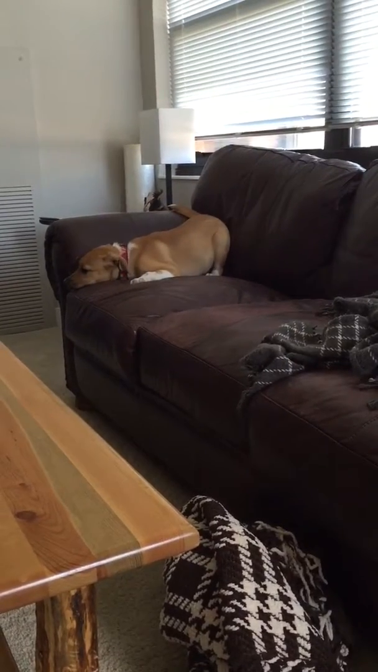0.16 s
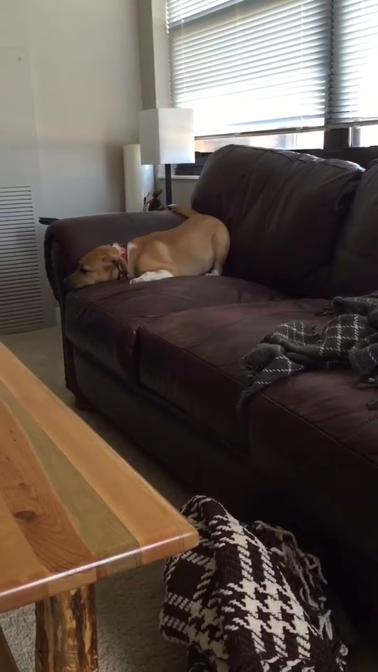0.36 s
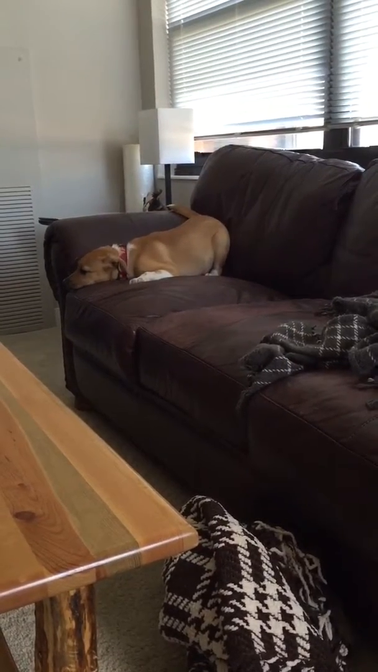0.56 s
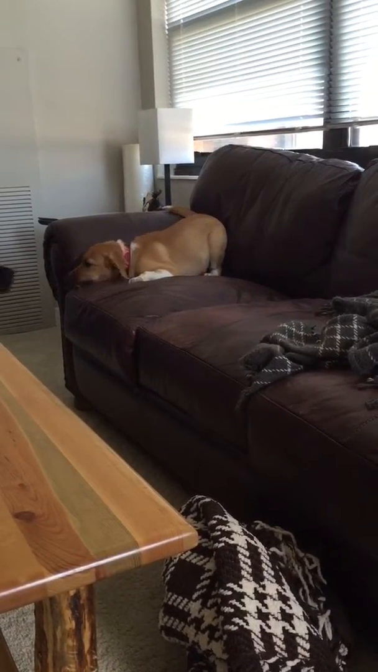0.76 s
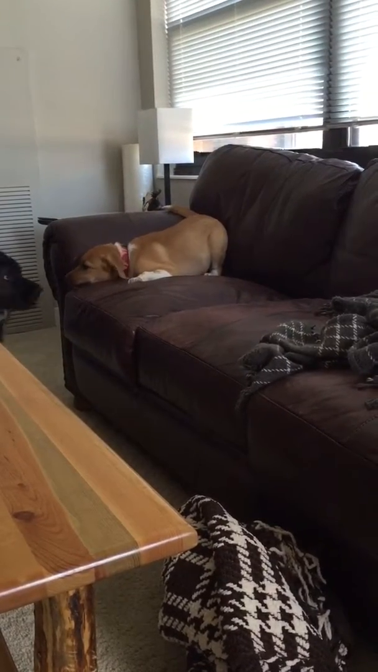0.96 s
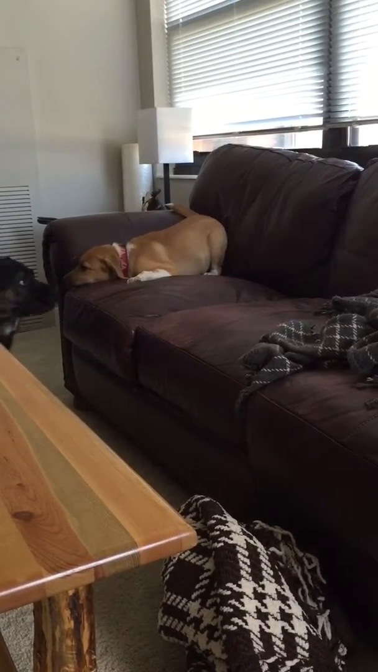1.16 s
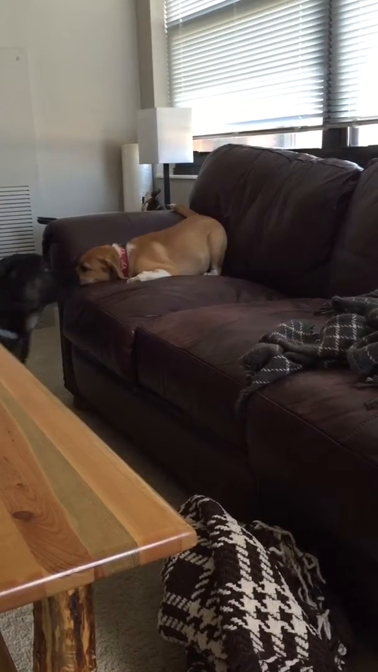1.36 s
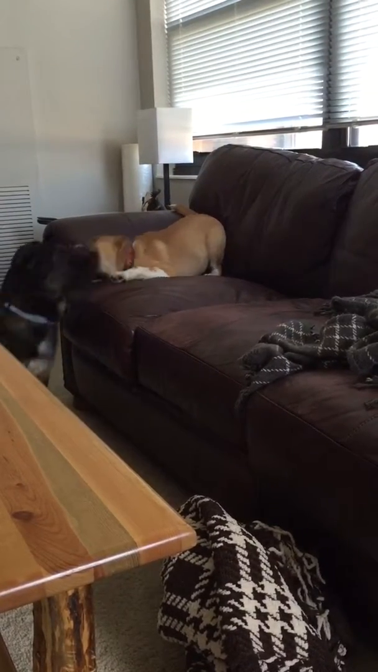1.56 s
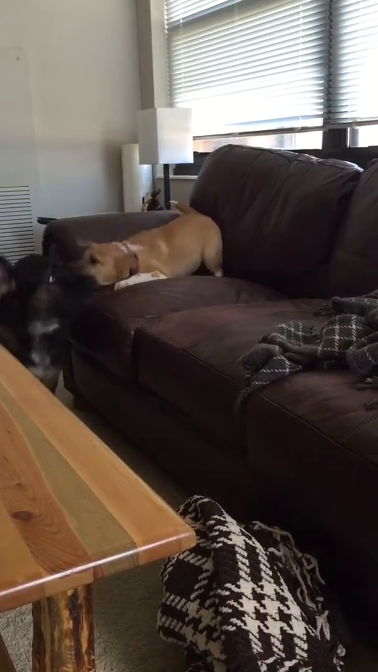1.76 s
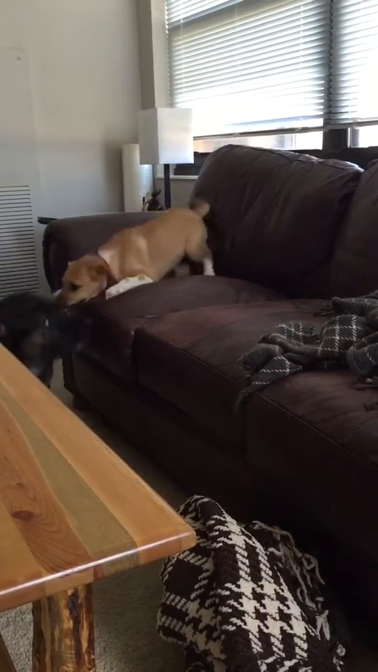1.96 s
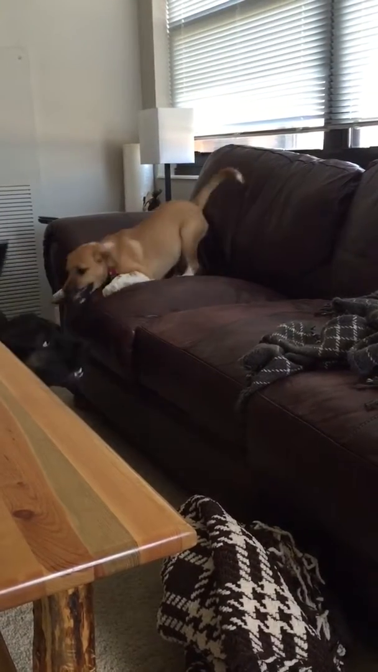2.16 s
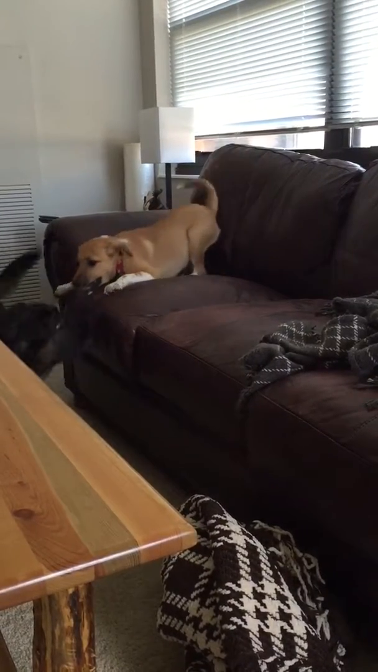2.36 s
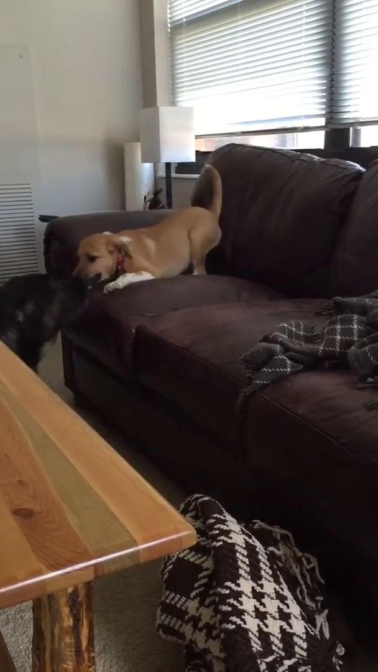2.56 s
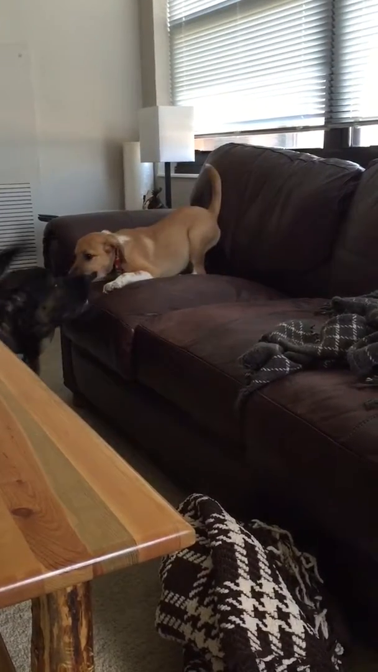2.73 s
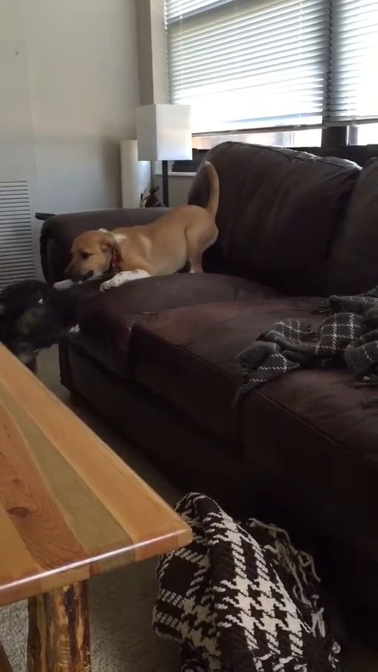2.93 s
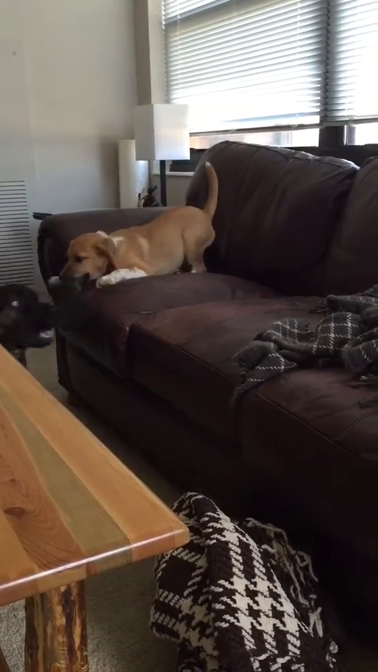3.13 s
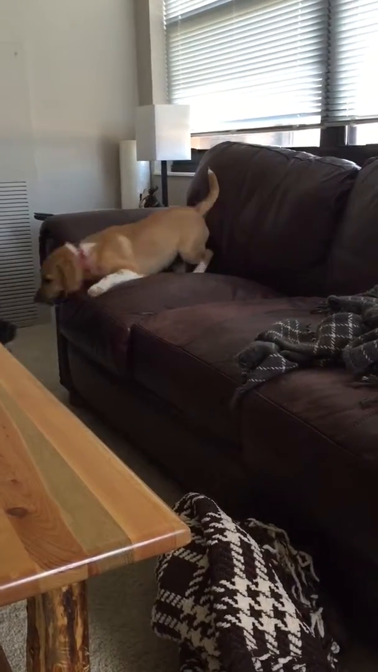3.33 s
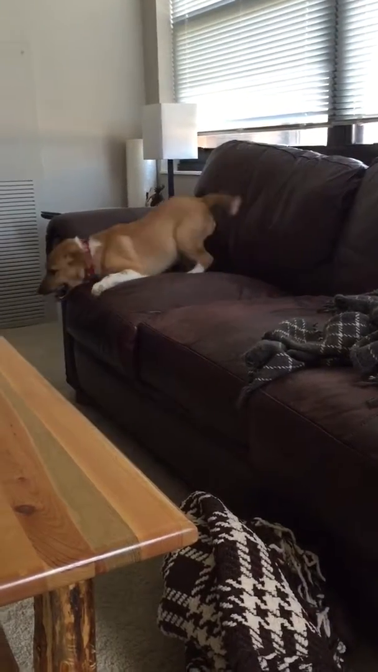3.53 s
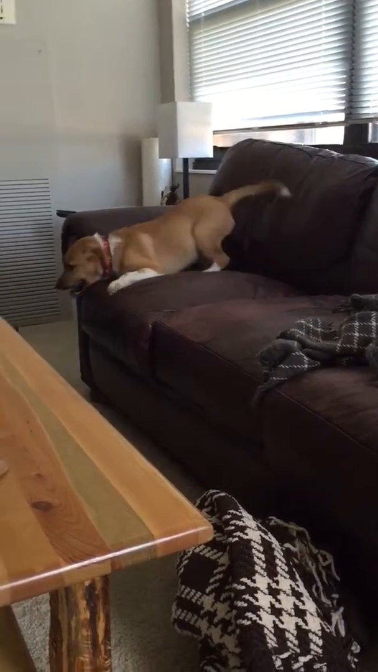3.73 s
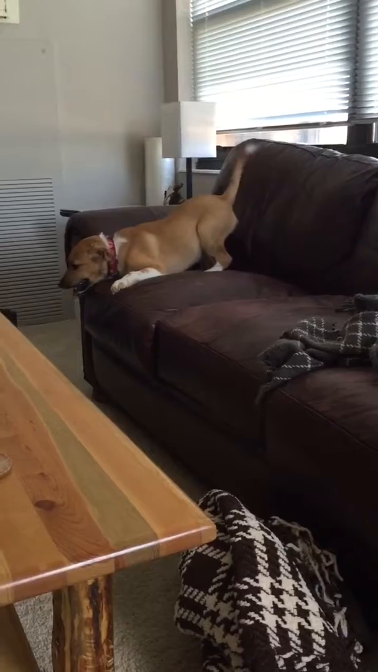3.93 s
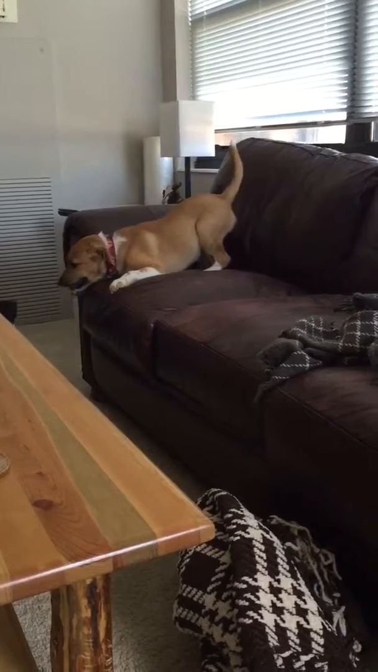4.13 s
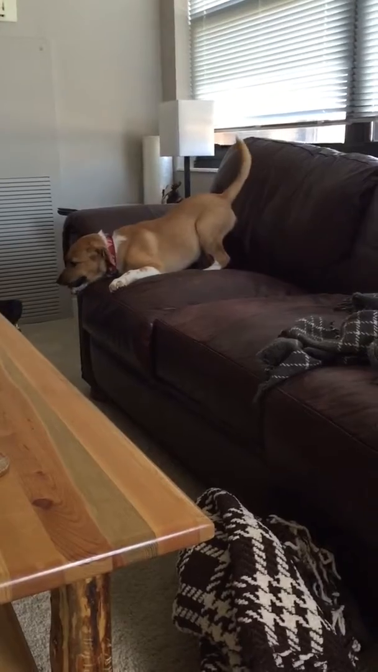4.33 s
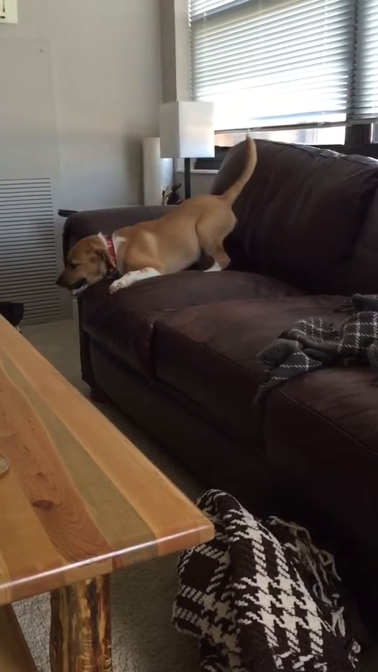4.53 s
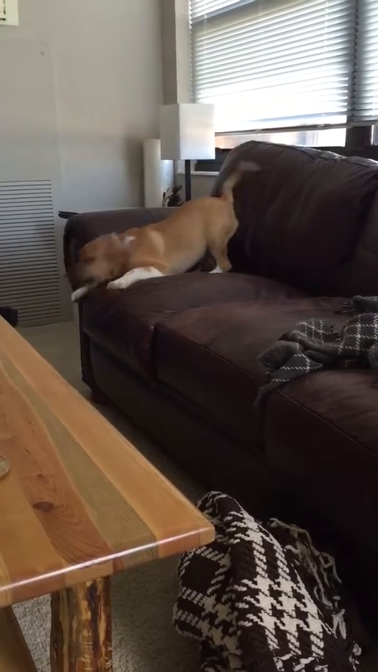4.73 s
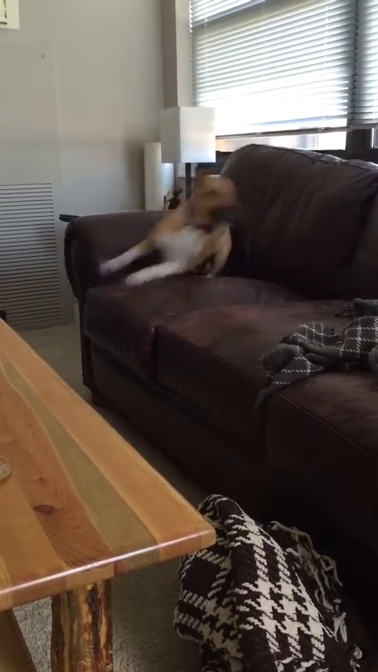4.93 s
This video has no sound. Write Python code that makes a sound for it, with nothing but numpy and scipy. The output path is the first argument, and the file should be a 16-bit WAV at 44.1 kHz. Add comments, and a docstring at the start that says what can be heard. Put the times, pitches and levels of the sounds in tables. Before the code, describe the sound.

A faint, steady low electric hum with soft ventilation rumble fills a furnished living room throughout about five seconds. A barely audible scuff on leather comes at 0.25 s, then a very thin, high, fluttering nasal whine at about 0.4 s. A faint breathy huff at 0.65 s and a stronger gruff one at 0.8 s follow, with a leather rub and light claw or collar brushes until 1.15 s. A third huff at 1.6 s and brushing lead into a low growl at 1.8 s that jumps up into a short, rough bark near 1.95 s. Soft scuffs continue from 2.1 to 3.15 s. The second bark, at 3.2 to 3.4 s, starts hoarse and clears into a louder yap. A scuff and brush tick at 3.8 s, then near quiet. The third bark, at 4.7 to 4.85 s, leaps upward, highest and clearest, its short room ring fading into the hum.

```python
"""A puppy on a leather sofa barks at another dog in a living room, over a steady electric hum and ventilation.
Soft scuffs start first, then a thin whine, two gruff huffs, light brushes and a third huff.
The first bark grows out of a low growl; after more scuffs the second starts hoarse and clears into a yap.
A last scuff and brush lead to the third bark, the highest and clearest.
Folds, rushing air and moving throat resonances make the voice; shaped noise makes the rubs and room air."""
import sys
import numpy as np
from scipy import signal
from scipy.fft import rfft, irfft
from scipy.io import wavfile
from scipy.ndimage import uniform_filter1d, minimum_filter1d

SR = 44100
rng = np.random.default_rng(int(sys.argv[2]) if len(sys.argv) > 2 else 0)


def wav_out(sig):
    """Save sig, one row per channel (or a flat mono array), as 16-bit PCM at SR to the path in sys.argv[1]."""
    wavfile.write(sys.argv[1], SR, np.round(np.clip(np.atleast_2d(sig).T, -1, 1) * 32767).astype(np.int16))


N = 224398  # samples, about 5.1 s
EDGE_HZ = 15300  # upper edge of everything heard


def gain_of(db):
    """Decibels to amplitude."""
    return 10 ** (np.asarray(db) / 20)


def evened(x):
    """Scales to rms 1."""
    return x / np.sqrt(np.mean(x ** 2) + 1e-20)


def blend(a, b, share):
    """Goes from a to b as share goes from 0 to 1."""
    return a + (b - a) * share


def read(points, hz):
    """Reads a table on a log-frequency axis."""
    f, value = np.transpose(points)
    return np.interp(np.log(hz + 1), np.log(f + 1), value)


def curves(rows):
    """Sample times and the columns of a table joined by straight lines."""
    s, *columns = np.transpose(rows)
    t = np.arange(s[0], s[-1], 1 / SR)
    return t, [np.interp(t, s, c) for c in columns]


def add(mix, s, sound):
    """Mixes a sound in at time s."""
    part = mix[round(s * SR):][:len(sound)]
    part += sound[:len(part)]


def hump(hz, centre, width):
    """Amplitude gain of a resonance, halved at half the width from its centre."""
    return 1 / (1 + (2 * (hz - centre) / width) ** 2)


def noise(gain, n):
    """Noise of rms 1 whose colour is the function gain(Hz)."""
    spectrum = rfft(rng.standard_normal(n)) * gain(np.fft.rfftfreq(n, 1 / SR))
    return evened(irfft(spectrum, n))


def waver(rate_hz, n):
    """Slow random drift of rms 1, mostly below the given rate."""
    return noise(lambda f: hump(f, 0, 2 * rate_hz), n)


# mains hum throughout the room: pitch_hz [Hz], level_db [dB rms]
HUM_TONES = [(120, -44), (240, -71.5), (360, -77)]


def mains_hum():
    """Steady sine tones at multiples of 120 Hz."""
    t = np.arange(N) / SR
    hum = np.zeros(N)
    for hz, db in HUM_TONES:
        phase = 2 * np.pi * (hz * t + rng.random())
        hum += gain_of(db) * np.sqrt(2) * np.sin(phase)
    return hum


# ventilation rumble in the room: centre_hz [Hz], width_hz [Hz at half amplitude], level_db [dB rms]
VENTILATION = [(67.8, 28, -56), (122.5, 29, -54), (179, 55, -59), (222, 31, -69)]


def ventilation_rumble():
    """Low noise gathered into broad resonances."""
    return sum(gain_of(db) * noise(lambda f: hump(f, hz, width), N) for hz, width, db in VENTILATION)


# colour of the room air, before its roll-off below 220 Hz: frequency_hz [Hz], density_db [relative dB per Hz]
AIR_COLOUR = [(15, -52), (25, -20.5), (69, -13), (95, 10), (125, 1.5), (146, -2.5), (167, -17.5),
              (237, -19), (335, -27.5), (543, -39), (604, -34), (691, -41.5), (769, -38.5), (1240, -47),
              (15000, -65.5)]
AIR_LEVEL_DB = -57.5  # rms


def room_air():
    """A faint steady murmur of noise, strongest near 100 Hz."""
    return gain_of(AIR_LEVEL_DB) * noise(lambda f: gain_of(read(AIR_COLOUR, f)) / (1 + (220 / (f + 1)) ** 4), N)


# ring time of the living room, scaled by a share for each tail: frequency_hz [Hz], t60_s [s, at share 1]
RING_TIMES = [(150, 1), (500, 0.64), (1100, 0.63), (2200, 0.6), (3300, 0.52), (4500, 0.54), (8000, 0.57),
              (14000, 0.45)]


def tail(t60_share, delay_s):
    """Dense reflections of energy 1, each band dying at its own speed."""
    signs = rng.choice([-1., 1.], SR)
    taps = signs * (rng.random(SR) < 4000 / SR) * (np.arange(SR) > delay_s * SR)
    hz, t, z = signal.stft(taps, SR, nperseg=256)
    decay = gain_of(-60 * t / (t60_share * read(RING_TIMES, hz)[:, None]))
    response = signal.istft(z * decay, SR, nperseg=256)[1][:SR]
    return response / np.linalg.norm(response)


# sofa, table and wall, with paths about 1, 3 and 4 m longer than the direct one:
# delay_s [s], gain [ratio to the direct sound]
NEAR_SURFACES = [(.0031, 0.12), (.0094, 0.22), (0.012, .2)]


def room(x, early_db=-3.5, early_share=0.34, late_db=-13.0, late_share=1.07):
    """Direct sound, near surfaces, a quick dense wash and a quieter long ring, together of energy 1."""
    response = gain_of(early_db) * tail(early_share, .002) + gain_of(late_db) * tail(late_share, 0.036)
    response[0] += 1  # straight to the microphone
    for s, gain in NEAR_SURFACES:
        response[round(s * SR)] += gain
    return signal.fftconvolve(x, response / np.linalg.norm(response))[:N]


def rub(colour, s, db, rise, fade, edge_hz=EDGE_HZ, grain_db=3):
    """A short stroke of grainy friction: a straight rise, then an exponential fade."""
    t = np.arange(SR // 3) / SR
    stroke = np.minimum(t / rise, 1) * np.exp(-np.maximum(t - rise, 0) / fade)
    grains = noise(lambda f: gain_of(read(colour, f)) / np.sqrt(1 + (f / edge_hz) ** 4), len(t))
    return s, gain_of(db) * stroke * evened(grains * gain_of(grain_db * waver(120, len(t))))


# paws and bodies on the sofa: start_s [s], level_db [dB], rise_s [s], fade_s [s], upper_edge_hz [Hz]
SOFA_SCUFFS = [(.245, -64, 0.0045, 0.015, 1490), (0.84, -54.5, 0.017, 0.017, 6000),
               (2.138, -53, 0.016, 0.038, 3630), (2.23, -70, 0.023, 0.031, 2910),
               (2.421, -68, 0.012, .04, 3065), (2.531, -56, 0.035, 0.02, 3580),
               (2.98, -70.5, .01, 0.017, 3460), (3.149, -54.5, 0.046, .03, 3560),
               (3.792, -53.5, 0.007, .025, 3917)]
# colour of rubbed leather: frequency_hz [Hz], level_db [dB]
LEATHER_COLOUR = [(100, -12), (230, -1), (600, 1), (1100, 0.5), (1500, 0), (2200, -0.5), (3300, -0.5),
                  (4500, -8.5), (15000, -26)]


def scuff(s, db, rise, fade, edge_hz):
    """Leather friction, its treble rolled off above the stroke's own edge."""
    return rub(LEATHER_COLOUR, s, db, rise, fade, edge_hz)


# light brushes of claws and collar: start_s [s], level_db [dB], rise_s [s], fade_s [s]
CLAW_BRUSHES = [(1.06, -57.5, 0.0017, 0.013), (1.145, -66.5, 0.012, 0.018), (1.615, -64, .015, 0.1),
                (1.699, -65, 0.0073, 0.035), (1.801, -52.5, 0.027, 0.12), (3.79, -60, 0.0089, 0.016)]
# colour of claws and collar: frequency_hz [Hz], level_db [dB]
CLAW_COLOUR = [(500, -12), (2500, -3.5), (6000, -6), (10000, -10.5), (15000, -7.5)]


def brush(s, db, rise, fade):
    """Bright friction of claws and collar."""
    return rub(CLAW_COLOUR, s, db, rise, fade)


# thin whines through the nose, strongest an octave above these pitches:
# start_s [s], length_s [s], level_db [dB, before its fade], first_pitch_hz [Hz], last_pitch_hz [Hz]
NOSE_WHINES = [(0.37, .088, -53.5, 3410, 3390), (0.438, 0.024, -64.5, 2730, 2730)]
WHINE_RISE_S, WHINE_FADE_DB_PER_S = .009, -150


def whine(s, length, db, first_hz, last_hz, jitter=0.0296, fundamental_db=-13):
    """A fluttering whistle, strongest at its octave."""
    t = np.arange(0, length, 1 / SR)
    hz = blend(first_hz, last_hz, t / length) * (1 + jitter * waver(250, len(t)))
    phase = 2 * np.pi * np.cumsum(hz) / SR
    level = np.minimum(t / WHINE_RISE_S, 1) * gain_of(db + WHINE_FADE_DB_PER_S * t)
    level *= signal.windows.tukey(len(t), .1)
    return s, level * evened(np.sin(2 * phase) + gain_of(fundamental_db) * np.sin(phase))


# low throb of the chest under huff, growl and hoarse attack, before its unsteadiness:
# start_s [s], length_s [s], level_db [dB, peak], first_pitch_hz [Hz], last_pitch_hz [Hz]
CHEST_THROBS = [(0.8, 0.041, -42.5, 231, 220), (1.798, 0.12, -31, 166.8, 173),
                (1.882, .135, -37, 235.3, 416), (3.215, .1, -42, 271.4, 334)]


def chest(s, length, db, first_hz, last_hz, unsteady=0.16):
    """An unsteady low tone that swells, throbs in level and fades."""
    u = np.arange(0, length, 1 / SR) / length
    hz = blend(first_hz, last_hz, u) * (1 + unsteady * waver(55, len(u)))
    phase = 2 * np.pi * np.cumsum(hz) / SR
    level = gain_of(db + 3.5 * waver(70, len(u))) * np.sin(np.pi * u)
    return s, level * np.sin(phase)


def peak(hz, centre, width):
    """A throat resonance, with dark valleys to either side."""
    return hump(hz, centre, width) ** 2


# throat resonances that stay put: centre_hz [Hz], width_hz [Hz at quarter amplitude], level_db [dB]
FIXED_RESONANCES = [(1220, 82, -18.5), (3180, 1900, -35.5)]
# the throat between and above its resonances, before the treble lift: frequency_hz [Hz], level_db [dB]
THROAT_FLOOR = [(60, -58), (160, -30), (400, -14.5), (1500, -22.5), (3700, -18.5), (4800, -40), (6200, -42),
                (7600, -35.5), (9600, -31.5), (10500, -39), (11800, -35.5), (15000, -45.5)]
JAW_WIDTH_HZ, TONGUE_WIDTH_HZ, LIP_WIDTH_HZ = 810, 720, 940  # before damping


def throat(x, rough, shape, low_hz, overtone_db, damping=0.69, overtone=2.0, overtone_width_hz=2200):
    """Moving resonances of jaw, tongue and lips over a floor whose treble rises and falls with the voice."""
    hz, at, z = signal.stft(x, SR, nperseg=512, noverlap=448)
    controls = (np.interp(at * SR, np.arange(len(x)), c) for c in [rough, *shape])
    rough, jaw_hz, tongue_hz, tongue_db, lip_hz, lip_db, treble_db = controls
    hz, broad = hz[:, None], .7 + damping * rough  # slack, open folds damp the throat
    modes = peak(hz, jaw_hz, JAW_WIDTH_HZ * broad)
    modes += sum(gain_of(db) * peak(hz, f, w) for f, w, db in FIXED_RESONANCES)
    modes += gain_of(tongue_db) * peak(hz, tongue_hz, TONGUE_WIDTH_HZ * broad)
    modes += gain_of(lip_db) * peak(hz, lip_hz, LIP_WIDTH_HZ * broad)
    gain = modes / (1 + (hz / 4400) ** 12) / (1 + (low_hz / (hz + 1)) ** 6)  # a small mouth radiates little bass
    # second mode of the lips
    gain += gain_of(overtone_db + treble_db / 2) * peak(hz, overtone * lip_hz, overtone_width_hz)
    gain += gain_of(read(THROAT_FLOOR, hz) + treble_db * np.clip(hz / 7000, 0, 1))
    log_gain = np.log(np.vstack([gain, gain[-2:0:-1]]))
    lag = signal.hilbert(log_gain, axis=0).imag[:len(hz)]  # each resonance rings after its pulse
    return signal.istft(z * gain * np.exp(-1j * lag), SR, nperseg=512, noverlap=448)[1][:len(x)]


def voice(hz, rough, shape, low_hz, overtone_db=-30, hiss=0.72, closure_hz=4500, fold_db=-8.0):
    """Vocal folds pulse, unevenly when hoarse, and chop the rushing air into puffs; short-term rms 1."""
    n, rough = len(hz), np.clip(rough, 0, 1)
    turns = np.cumsum(hz * (1 + .028 * rough * waver(150, n))) / SR
    folds = np.zeros(n)
    for k in range(1, 40):
        harmonic = np.cos(2 * np.pi * k * turns) * (k * hz < EDGE_HZ)
        folds += harmonic / np.hypot(1, (k * hz / closure_hz) ** 3)
    folds = gain_of(fold_db) * evened(folds * (1 + .5 * rough * waver(220, n)))
    gate = 0.27 + np.exp(-(turns % 1) / 0.35)  # air bursts out each turn, then ebbs
    puffs = evened(gate * noise(lambda f: 1 - 1 / (1 + (f / np.median(hz)) ** 8), n))  # little air below the pitch
    teeth = evened(gate * noise(lambda f: 1 - 1 / (1 + (f / 4500) ** 6), n))  # air whistling past the teeth
    source = (1 - rough) * folds + rough * puffs + hiss * teeth
    sound = throat(source, rough, np.broadcast_arrays(*shape), low_hz, overtone_db)
    steady = sound / np.sqrt(uniform_filter1d(sound ** 2, size=600) + 1e-12)
    return steady * signal.windows.tukey(n, .03)


# soft gruff huffs, before the mouth opens and the level fades:
# start_s [s], length_s [s], level_db [dB], pitch_hz [Hz], first_roughness [0-1], jaw_hz [Hz, before its share],
# tongue_hz [Hz], tongue_db [dB at mid-huff], lip_hz [Hz], lip_db [dB at mid-huff], treble_db [dB]
GRUFF_HUFFS = [(0.646, 0.093, -62.5, 382, 0.6, 800, 1980, -11, 3300, -13, 1),
               (.806, 0.083, -49, 248.2, 0.25, 760, 1600, 2, 2190, 4, -7),
               (1.611, 0.087, -51.5, 303, 0.7, 800, 1619, 10.5, 3070, -0.5, 1.5)]
HUFF_RISE_S, HUFF_FADE_DB, HUFF_OPENING_DB = .012, -11, 22
HUFF_JAW_START, HUFF_JAW_END = 0.66, 0.91  # shares of jaw_hz
HUFF_LAST_ROUGH, HUFF_LOW_HZ = .85, 380  # ends mostly as air; the resonances give little below this


def huff(s, length, db, hz, rough, jaw_hz, tongue_hz, tongue_db, lip_hz, lip_db, treble_db):
    """A short low grunt that turns to air and brightens as the mouth opens."""
    t = np.arange(0, length, 1 / SR)
    u = t / length
    bright_db = HUFF_OPENING_DB * (u - .5)
    level = np.minimum(t / HUFF_RISE_S, 1) * gain_of(db + HUFF_FADE_DB * u ** 3)
    jaw_path = jaw_hz * blend(HUFF_JAW_START, HUFF_JAW_END, u)
    shape = (jaw_path, tongue_hz, tongue_db + bright_db, lip_hz, lip_db + bright_db, treble_db)
    return s, level * voice(np.full(len(t), hz), blend(rough, HUFF_LAST_ROUGH, u), shape, HUFF_LOW_HZ)


# each bark's mouth opens, then closes: widest_s [s], closing_s [s], jaw_start_hz, jaw_wide_hz, jaw_shut_hz [Hz],
# tongue_start_hz, tongue_wide_hz, tongue_shut_hz [Hz], lip_wide_hz, lip_shut_hz [Hz],
# muffle_db [dB added to the tongue resonance on closing]
MOUTH_GESTURES = [(1.963, .04, 790, 1150, 748, 1547, 1957, 2160, 3240, 3550, 3),
                  (3.29, 0.13, 1119, 1162, 915, 2200, 2074, 1910, 3005, 3168, 1),
                  (4.748, 0.052, 860, 950, 740, 2110, 1760, 1520, 3190, 2704, -6.5)]
LIP_START = 0.88  # the lip resonance at the start, as a share of its widest value


def mouth(t, widest, closing_s, jaw_start, jaw_wide, jaw_shut,
          tongue_start, tongue_wide, tongue_shut, lip_wide, lip_shut, muffle_db):
    """One opening and closing moves the resonances of jaw, tongue and lips together."""
    moments = [t[0], widest, widest + closing_s]
    paths = [(jaw_start, jaw_wide, jaw_shut), (tongue_start, tongue_wide, tongue_shut),
             (LIP_START * lip_wide, lip_wide, lip_shut), (0, 0, muffle_db)]
    return [np.interp(t, moments, path) for path in paths]


# effort and pitch through each bark, one list a bark: time_s [s], effort_db [dB], pitch_hz [Hz]
BARK_PATHS = [
    [(1.785, -48.5, 231.5), (1.81, -38, 228.6), (1.823, -31.5, 229.8), (1.875, -34, 238.8),
     (1.92, -28, 285.5), (1.945, -17.5, 378), (1.962, -19, 381.1), (1.985, -19.5, 374.3), (2.02, -35, 361)],
    [(3.206, -32.5, 396), (3.23, -22, 394), (3.256, -16, 391.9), (3.29, -16.5, 423.6), (3.308, -9, 491.5),
     (3.33, -15.5, 505), (3.372, -14.5, 482.1), (3.394, -16.5, 495.1), (3.406, -30, 484)],
    [(4.686, -30.5, 384), (4.699, -22, 398.2), (4.708, -11.5, 412.2), (4.721, -11, 437.3),
     (4.729, -12.5, 573.4), (4.748, -13, 594.4), (4.79, -7.5, 649.4), (4.826, -8, 644.2),
     (4.835, -20, 540.4), (4.85, -35, 522)],
]
# each bark's voice at its lowest (slack) and highest (taut) pitch, before crack and dull start:
# roughness_slack, roughness_taut [0-1], tongue_slack_db, tongue_taut_db [dB], lip_slack_db, lip_taut_db [dB],
# treble_slack_db, treble_taut_db [dB], lip_overtone_db [dB, before half the treble is added]
BARK_VOICES = [(.72, .27, -10.5, -7.5, -20.5, -10.5, -6.5, -10.5, -32.5),
               (.45, 0.18, -11, 1.5, -14.5, 2, -9, 1, -26),
               (0.17, 0.06, -1, -0.5, -23.5, 0.5, -3, -0.5, -34)]
CRACK_S = .008  # roughness added per octave a second of pitch change
BLOOM_S, DULL_DB = .015, -5.5  # a bark starts dull; its treble blooms with this time constant
BARK_LOW_HZ = 564  # the resonances give little below this


def bark(rows, quality, gesture):
    """As the pitch climbs the folds tighten, so the voice clears and brightens; it cracks where the pitch jumps."""
    t, (effort_db, hz) = curves(rows)
    jaw_hz, tongue_hz, lip_hz, muffle_db = mouth(t, *gesture)
    tension = (hz - hz.min()) / np.ptp(hz)
    *pairs, overtone_db = quality
    blends = (blend(slack, taut, tension) for slack, taut in zip(pairs[::2], pairs[1::2]))
    rough, tongue_db, lip_db, treble_db = blends
    octaves_per_s = uniform_filter1d(abs(np.gradient(np.log2(hz), t)), size=500)
    cracked = rough + CRACK_S * octaves_per_s
    dull_db = DULL_DB * np.exp(-(t - t[0]) / BLOOM_S)
    shape = (jaw_hz, tongue_hz, tongue_db + muffle_db, lip_hz, lip_db + dull_db, treble_db + dull_db)
    return t[0], gain_of(effort_db) * voice(hz, cracked, shape, BARK_LOW_HZ, overtone_db)


def scene():
    """Rubs, whines, huffs and barks ring in the living room, over its hum, ventilation and air."""
    sofa = np.zeros(N)
    layers = [(scuff, SOFA_SCUFFS), (brush, CLAW_BRUSHES), (whine, NOSE_WHINES),
              (chest, CHEST_THROBS), (huff, GRUFF_HUFFS), (bark, zip(BARK_PATHS, BARK_VOICES, MOUTH_GESTURES))]
    for source, rows in layers:
        for row in rows:
            add(sofa, *source(*row))
    background = mains_hum() + ventilation_rumble() + room_air()
    return (room(sofa) + background)[None]


def record(dry, ceiling=0.69):
    """At the microphone, a fast limiter holds the loudest peaks; then the band limit."""
    gain = minimum_filter1d(np.minimum(1, ceiling / (abs(dry) + 1e-9)), size=300)
    limited = dry * uniform_filter1d(gain, size=300)
    low_pass = signal.firwin(511, EDGE_HZ, window=("kaiser", 9), fs=SR)
    return signal.oaconvolve(limited, low_pass[None], "same")


dry = scene()
out = record(dry)
wav_out(out)
```